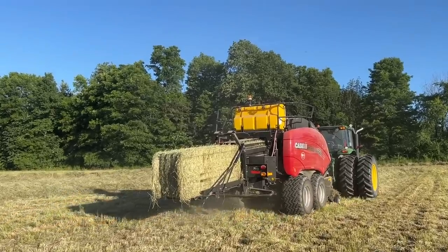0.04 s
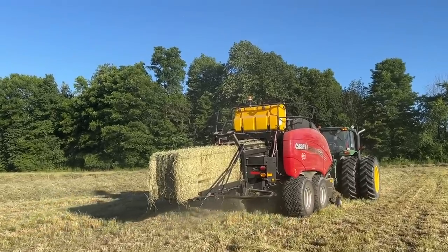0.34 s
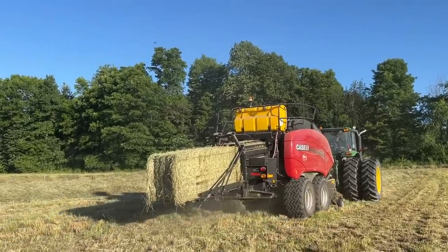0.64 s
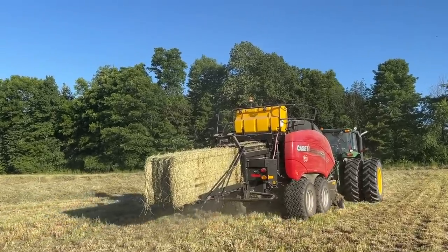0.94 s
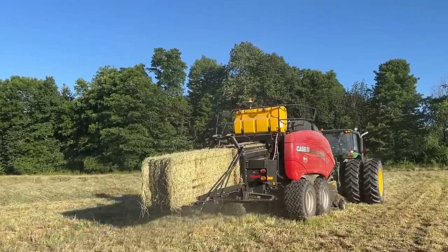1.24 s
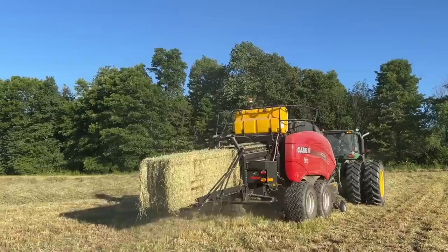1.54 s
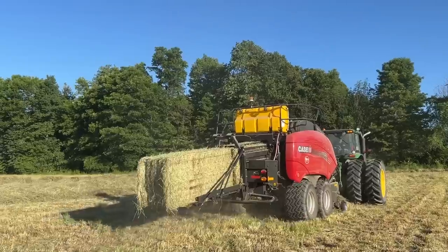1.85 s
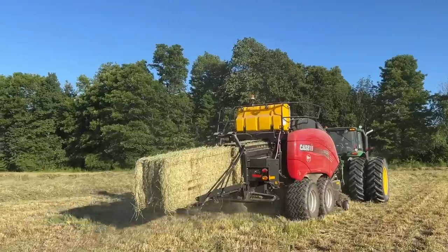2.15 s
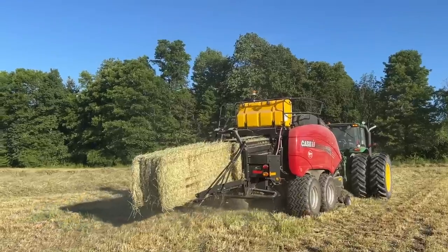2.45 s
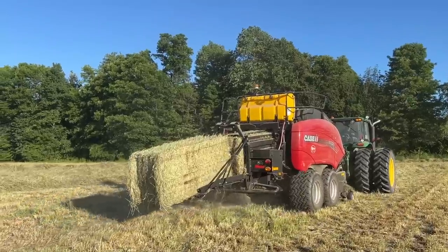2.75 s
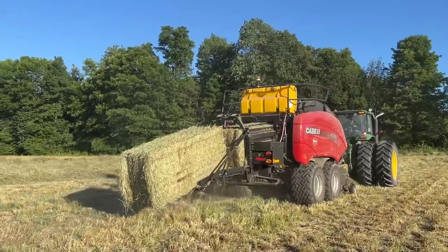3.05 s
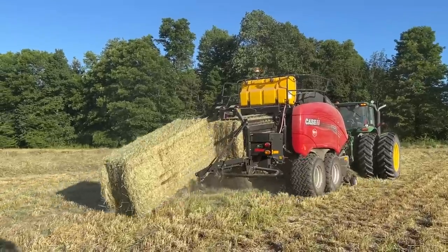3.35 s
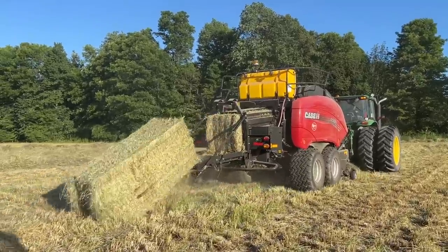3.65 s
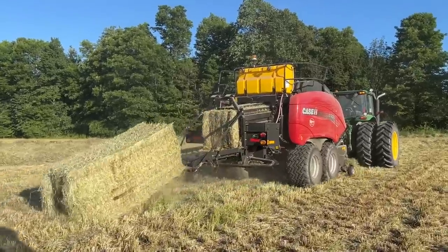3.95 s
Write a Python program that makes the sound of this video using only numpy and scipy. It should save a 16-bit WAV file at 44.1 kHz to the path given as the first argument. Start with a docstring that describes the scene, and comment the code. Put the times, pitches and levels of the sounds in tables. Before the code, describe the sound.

A hay baler slams about once a second over a tractor's throbbing drone, with clanks and rattling chains between strokes. Near the end a bale scrapes off. It works some way off in an open field, slightly right.

```python
"""A plunger slams into hay over a tractor's throbbing drone: a big square baler at work in an open field,
some way off and a little to the right of a stereo microphone. The strokes come every 1.2 s and ring the
steel frame; between them the feeder clanks and groans. Chains and gears clatter throughout and straw
crackles in the pickup. Near the end, after a weaker stroke, a bale slides off onto the stubble."""
import sys
import numpy as np
from scipy.fft import rfft, irfft, next_fast_len
from scipy.io import wavfile
from scipy.ndimage import map_coordinates

SR = 44100
rng = np.random.default_rng(int(sys.argv[2]) if len(sys.argv) > 2 else 0)


def store_pcm(level_fs):
    """Save levels as 16-bit WAV."""
    pcm = np.round(np.clip(level_fs, -1, 1) * 32767).astype(np.int16)
    wavfile.write(sys.argv[1], SR, np.atleast_2d(pcm).T)


N = 176400


def exhaust():
    """The tractor's drone, right of centre: neighbouring engine orders beat into one throb per cycle."""
    # Each row: time in seconds, engine cycles per second.
    speed = [(0.0, 20.208), (0.33, 19.951), (0.67, 20.108), (1.0, 20.139), (1.33, 20.159), (1.67, 20.576),
             (2.0, 20.32), (2.33, 20.886), (2.67, 20.347), (3.0, 20.52), (3.33, 20.378), (3.67, 20.587),
             (4.0, 20.008)]
    # Each row: an exhaust tone as a multiple of the cycle rate, level in dB.
    orders = [(2, -41), (3, -51), (4, -20.5), (5, -16.5), (6, -29.5), (9, -39.5)]
    cycles = -.505 + np.cumsum(np.interp(clock(), *np.transpose(speed))) / SR
    drone = sum(amp(db + 0.23 * wobble(7.6)) * np.cos(2 * np.pi * k * cycles) for k, db in orders)
    return np.sqrt(2) * drone * amp([[-2], [2]])


def plunger():
    """A bright crash of knives and loose steel, a thud that rings the frame, then knocks in the slack."""
    # Each row: start in seconds, crash level in dB, thud level in dB.
    strokes = [(.016, -17.5, -24.5), (1.228, -17, -21), (2.437, -16, -21), (3.644, -31.5, -33)]
    # Each row: start of a knock in seconds, level in dB.
    knocks = [(.030, -19.5), (.066, -21.5), (1.249, -18.5), (1.281, -23), (2.476, -23.5), (2.495, -18.5),
              (2.533, -26.5), (3.653, -24.5)]
    # Each row of both spectra: frequency in Hz, relative level in dB.
    crash_spectrum = [(200, 1), (600, -2), (1300, 0), (2000, -4.5), (2800, -4), (3800, -12), (5100, -12),
                      (6200, -20.5), (8000, -22.5), (11000, -20), (15500, -37)]
    thud_spectrum = [(100, -6.5), (220, 0.5), (340, -2), (480, -1), (700, -9), (1200, -13), (2200, -16.5),
                     (5000, -31), (12000, -46.5)]
    lag_s = 0.0054
    crash = sum(amp(db) * burst(s, 0.0087, 0.007, 0.19) for s, db, _ in strokes)
    thud = sum(amp(db) * burst(s + lag_s, 0.0098, 0.013, 0.31) for s, _, db in strokes)
    knock = sum(amp(db) * burst(s, 0.0038, 0.0043, 0.087) for s, db in knocks)
    ring = sum(amp(db - 4) * frame_ring(s + lag_s) for s, _, db in strokes)
    ring += sum(amp(db - 8.5) * frame_ring(s) for s, db in knocks)
    return (ring + crash * rattle(crash_spectrum, grain_db=2)
            + thud * rattle(thud_spectrum, grain_db=-1.5)
            + knock * rattle(thud_spectrum, grain_db=-1.5))


def frame_ring(start):
    """The modes of the baler's steel frame, struck a little differently each time."""
    # Each row: frequency in Hz, level in dB, seconds to fall 60 dB.
    modes = [(232.5, 2, 0.27), (285.4, -3, 0.23), (413.3, 3, 0.14), (483.5, -1.5, 0.22), (586, -2, 0.27),
             (693.6, -2, 0.17), (908, -4, 0.1), (1104, -2, 0.28), (1295, -5, 0.2), (1540, -15, 0.16),
             (2630, -8, 0.12), (4340, -14, 0.11)]
    t = np.arange(SR // 2) / SR
    attack = 1 - np.exp(-t / 0.0014)
    out = np.zeros((2, N + SR))
    for hz, db, t60 in modes:
        size, detune, angle, skew = rng.standard_normal(4)
        phase = 2 * np.pi * (hz * (1 + 0.013 * detune) * t + angle) + 0.21 * skew * np.array([[1], [-1]])
        decay = amp(db + 1.8 * size - 60 * t / t60)
        out[:, round(start * SR):][:, :len(t)] += attack * decay * np.sin(phase)
    return out[:, :N]


def feeder_clanks():
    """The feeder's linkage clanks, coloured by resonating sheet-metal panels."""
    # Each row: start in seconds, level in dB, hold and 60 dB decay in seconds, treble lift in dB.
    hits = [(0.586, -19.5, 0.0074, 0.15, -6), (0.86, -20, 0.023, 0.08, -5.5), (0.891, -23, .012, 0.35, -6),
            (1.766, -30.5, .012, .1, -5), (1.81, -27, 0.026, 0.11, -2), (2.042, -24.5, 0.012, 0.19, -4),
            (2.073, -22, 0.013, 0.35, -8), (3.11, -25, 0.013, 0.14, 2), (3.632, -24.5, .008, .08, -5)]
    # Each row: frequency in Hz, relative level in dB.
    spectrum = [(150, 6), (350, 1.5), (900, -0.5), (1450, -4.5), (2200, -7), (4500, -15), (8000, -26.5),
                (12500, -28), (15500, -37)]
    # Each row: panel resonance in Hz, width in Hz, lift in dB.
    panels = [(586, 74, 3.5), (804, 22, 4), (1060, 34, 7), (1380, 110, 8.5)]
    colour = lambda hz: amp(sum(db * resonance(hz, centre, width) for centre, width, db in panels))
    steel = unit(filtered(rattle(spectrum, grain_db=1), colour))
    treble = filtered(steel, lambda hz: 1 - 1 / (1 + (hz / 1900) ** 4))
    return sum(amp(db) * burst(s, 0.0035, hold, t60) * (steel + (amp(lift_db) - 1) * treble)
               for s, db, hold, t60, lift_db in hits)


def feeder_load():
    """Hay is packed with dull booms, and the feeder groans, rising in pitch under the load."""
    # Each row: start in seconds, level in dB, hold in seconds.
    booms = [(0.88, -21.5, 0.052), (1.027, -23.5, 0.054), (2.093, -19.5, 0.02), (2.193, -21, 0.034),
             (3.444, -19, 0.026)]
    # Each row: frequency in Hz, relative level in dB.
    boom_spectrum = [(50, -5), (110, 2), (150, 1), (190, -1), (260, -17.5), (500, -16), (1200, -53.5)]
    # Each row: start in seconds, hold in seconds, level in dB.
    groans = [(0.967, 0.17, -27), (2.166, 0.4, -31)]
    groan_hz, rise_hz_per_s = 168.3, 38
    packing = sum(amp(db) * burst(s, 0.021, hold, 0.16) for s, db, hold in booms)
    out = packing * rattle(boom_spectrum, grain_db=1)
    for s, hold, db in groans:
        hz = groan_hz + rise_hz_per_s * (clock() - s) + 9 * wobble(60)
        level = amp(db + 4.9 * wobble(29.5)) * burst(s, 0.032, hold, 0.21)
        out += level * np.sin(2 * np.pi * np.cumsum(hz) / SR)
    return out


def running_gear():
    """The steady bed: rumble of the chassis, clatter of chains and pickup, and the ring of the gears."""
    # Each row of both spectra: frequency in Hz, relative level in dB.
    rumble_spectrum = [(20, -26), (30, -10), (42, -8.5), (62, 5), (100, 1.5), (170, 1), (230, -9.5),
                       (400, -24), (900, -64)]
    clatter_spectrum = [(100, -3.5), (250, -1.5), (480, -0.5), (750, -3), (1100, -3), (1450, -6.5),
                        (1900, -11.5), (2700, -15), (4000, -20.5), (6500, -24.5), (9000, -31), (12000, -27),
                        (15500, -36)]
    # Each row: gear resonance in Hz, width in Hz, level in dB.
    gears = [(318.5, 7, -43), (498, 30, -46.5), (1335, 60, -41), (1510, 170, -49.5), (2640, 24, -57.5),
             (3193, 43, -56.5), (6640, 60, -67)]
    rumble = amp(-26.5 + 1.7 * wobble(8.75)) * rattle(rumble_spectrum, grain_db=1.5, rate=40)
    clatter = amp(-29.5 + 0.63 * wobble(5.02) + 0.95 * wobble(45)) * rattle(clatter_spectrum, grain_db=1)
    peaks = lambda hz: sum(amp(db) / np.sqrt(width) * resonance(hz, centre, width)
                           for centre, width, db in gears)
    whine_gain = np.linalg.norm([amp(db) for _, _, db in gears])
    return rumble + clatter + whine_gain * at_ports(rng.standard_normal((2, N)), peaks)


def bale():
    """The bale sticks and slips down the steel chute, scraping and squealing; its end bumps the ground."""
    # Each row: start in seconds, level in dB, hold in seconds.
    scrapes = [(3.735, -27.5, 0.0055), (3.75, -32.5, 0.012), (3.785, -27.5, 0.0041), (3.817, -29.5, 0.0075),
               (3.864, -30.5, 0.0088)]
    # Each row: start in seconds, hold in seconds, level in dB, pitch in Hz.
    squeaks = [(3.787, 0.0078, -28.5, 1600), (3.83, .007, -34, 1640), (3.859, 0.026, -39, 3160)]
    # Each row: start in seconds, level in dB.
    bumps = [(3.41, -28.5), (3.772, -28)]
    # Each row of both spectra: frequency in Hz, relative level in dB.
    scrape_spectrum = [(150, -8), (400, -0.5), (1300, 5), (2200, -5.5), (4000, -14), (8000, -27),
                       (15000, -28)]
    bump_spectrum = [(120, -19), (280, 10), (620, -0.5), (900, -17), (2500, -34)]
    wavering_time = np.cumsum(1 + 0.0059 * wobble(25) + .014 * wobble(600)) / SR
    squeals = sum(amp(db) * burst(s, .003, hold, 0.075) * np.sin(2 * np.pi * hz * wavering_time)
                  for s, hold, db, hz in squeaks)
    scrape = sum(amp(db) * burst(s, 0.004, hold, 0.15) for s, db, hold in scrapes)
    bump = sum(amp(db) * burst(s, 0.014, 0.008, 0.17) for s, db in bumps)
    return (squeals + scrape * rattle(scrape_spectrum, grain_db=1)
            + bump * rattle(bump_spectrum, grain_db=5))


def chain_chinks():
    """Chain links scratch and ring briefly, each at one high pitch."""
    # Each row: start in seconds, level in dB, pitch in Hz.
    chinks = [(0.1722, -33, 5640), (0.4041, -35.5, 6830), (1.0936, -35, 6700), (2.2544, -35.5, 6700),
              (2.3033, -38, 6170), (2.3657, -38, 7900), (2.555, -37, 6300), (2.772, -35, 6380),
              (3.0012, -35, 6800), (3.071, -30, 6880), (3.298, -32.5, 8030), (3.4178, -33.5, 6980),
              (3.768, -40, 6760), (3.879, -30, 6870)]
    # Each row: frequency in Hz, relative level in dB.
    scratch_spectrum = [(3000, -12), (7800, -2), (11000, -16)]
    # Fast flutter, partly shared by left and right, widens each tone into a band.
    flutter = amp(-9.5) * (np.array([wobble(900), wobble(900)]) + wobble(900))
    scratch = amp(-10.5) * rattle(scratch_spectrum, grain_db=1.5)
    return sum(amp(db) * burst(s, 0.0033, .003, 0.093) * (flutter * tone(hz) + scratch)
               for s, db, hz in chinks)


def hay():
    """Hay rustles as it is stuffed into the chamber, dry stalks snap, and straw crackles in the pickup."""
    # Each row: start in seconds, hold in seconds, level in dB.
    stuffings = [(0.988, 0.16, -37.5), (2.135, 0.08, -37), (3.363, 0.2, -41)]
    # Each row: start in seconds, level in dB.
    snaps = [(1.14, -41.5), (1.272, -39.5), (1.817, -44), (2.434, -39), (3.558, -44)]
    # Each row of the three spectra: frequency in Hz, relative level in dB.
    rustle_spectrum = [(600, -5.5), (1700, 1.5), (2800, -3), (4500, -10.5), (8000, -16), (15000, -23)]
    snap_spectrum = [(4000, -21), (9000, -4), (13500, 5), (16000, -9)]
    straw_spectrum = [(2500, -27), (4500, 7), (6800, 0), (8500, 4.5), (13000, -20), (15500, -11)]
    stuffing = sum(amp(db) * burst(s, 0.066, hold, 0.21) for s, hold, db in stuffings)
    snapping = sum(amp(db) * burst(s, .002, .003, 0.046) for s, db in snaps)
    rustle = unit(amp(6.2 * np.minimum(wobble(50), 1)) * rattle(rustle_spectrum, grain_db=0.5))
    crackle = unit(amp(7.5 * np.minimum(wobble(35), 2)) * rattle(straw_spectrum, grain_db=-3.5))
    return stuffing * rustle + snapping * rattle(snap_spectrum, grain_db=3) + amp(-55.5) * crackle


def faint_high_ticks():
    """Faint, brief high rings tick at random, spread over an octave."""
    count, centre_hz, t60 = 400, 5730, .016
    t = np.arange(SR // 20) / SR
    out = np.zeros((2, N + len(t)))
    for start, softness, pitch, skew in rng.random((count, 4)):
        hz = centre_hz * 2 ** (pitch - .5)
        phase = 2 * np.pi * (hz * t + (skew - .5) * np.array([[0], [.5]]))
        decay = amp(-39.5 - 10 * softness - 60 * t / t60)
        out[:, int(start * N):][:, :len(t)] += decay * np.sin(phase)
    return out[:, :N]


def bearing():
    """A dry bearing gives faint, fluttering whistles."""
    # Each row: start in seconds, hold in seconds, level in dB, pitch in Hz.
    whistles = [(2.075, .035, -45, 12250), (2.6, .03, -52, 13600), (3.716, .045, -47, 13500)]
    return wobble(400) * sum(amp(db) * burst(s, .008, hold, .1) * tone(hz) for s, hold, db, hz in whistles)


def rattle(spectrum, grain_db, rate=700):
    """A dense shower of tiny contacts whose sizes vary by grain_db."""
    contacts = rng.standard_normal((2, N)) * amp(grain_db * wobble(rate))
    return at_ports(contacts, lambda hz: amp(along(spectrum, hz)))


def at_ports(pair, colour):
    """Two unrelated signals become the microphone's coloured, partly alike left and right, at rms 1."""
    # Each row: frequency in Hz, likeness of the two ports (0 unrelated, 1 or more identical).
    likeness = [(115, 1), (135, 0.76), (270, 0.85), (700, 0.48), (2500, 0.55), (4500, 0.14), (7000, 0.3),
                (8500, 0.2), (9000, 0), (11800, 3), (12100, 0), (13500, 1), (15500, 1)]
    def mix(hz):
        turn = np.arccos(np.clip(along(likeness, hz), 0, 1)) / 2
        return colour(hz) * np.array([np.cos(turn), np.sin(turn)])
    mid, side = filtered(pair, mix)
    return unit(np.array([mid + side, mid - side]))


def burst(start, rise, hold, t60):
    """Swell up to the start, hold, then fall 60 dB in t60; all in seconds."""
    t = clock() - start
    return np.exp(-(np.minimum(t, 0) / rise) ** 2) * amp(-60 * np.clip(t - hold, 0, 3 * t60) / t60)


def wobble(rate):
    """A smooth random curve, rate knots a second."""
    return map_coordinates(rng.standard_normal(8192), [clock() * rate + 2], mode="wrap")


def filtered(x, response):
    """Shape x by a complex response of frequency."""
    size = next_fast_len(N + 8192)
    return irfft(rfft(x, size) * response(np.fft.rfftfreq(size, 1 / SR)), size)[..., :N]


def resonance(hz, centre, width):
    """A resonant peak of height 1."""
    return 1 / (1 + (2 * (hz - centre) / width) ** 2)


def along(points, hz):
    """Interpolate (Hz, value) points on a log axis."""
    freqs, values = np.transpose(points)
    return np.interp(np.log(hz + 1), np.log(freqs + 1), values)


def tone(hz):
    """A steady sine."""
    return np.sin(2 * np.pi * hz * clock())


def amp(db):
    """Decibels to gain."""
    return 10 ** (np.asarray(db) / 20)


def unit(x):
    """Scale to rms 1."""
    return x / np.sqrt(np.mean(x ** 2) + 1e-20)


def clock():
    """Time of each sample in seconds."""
    return np.arange(N) / SR


def scene():
    """The machine stands a little to the right, so its sound meets the two microphone ports unequally."""
    # Each row: frequency in Hz, left minus right in dB.
    balance = [(30, -1), (130, -2.7), (250, 1.5), (500, -1.7), (1200, 1.3), (2200, -2), (4000, 2.4),
               (8000, .2)]
    # Each row: frequency in Hz, phase lead of the left port in radians.
    lead = [(200, 0), (900, -.3), (1800, -.9), (2800, -.15), (3700, -.8), (4500, 0), (5700, -2.2),
            (6600, -.1), (8200, -1.2), (9600, -3.0), (10700, -3.3), (11500, -4.7), (12700, -6.28),
            (14700, -6.4), (15600, -8.2)]
    baler = (plunger() + feeder_clanks() + feeder_load() + running_gear() + bale()
             + chain_chinks() + hay() + faint_high_ticks() + bearing())
    half = np.array([[.5], [-.5]])
    placement = lambda hz: amp(half * along(balance, hz)) * np.exp(1j * half * along(lead, hz))
    return exhaust() + filtered(baler, placement)


def record(dry):
    """The recorder thins the deepest bass and keeps nothing above its band limit."""
    low_cut_hz, top_hz = 30, 15800
    return filtered(dry, lambda hz: (hz < top_hz) * (1 - 1 / (1 + (hz / low_cut_hz) ** 6)))


dry = scene()
out = record(dry)
store_pcm(out)
```